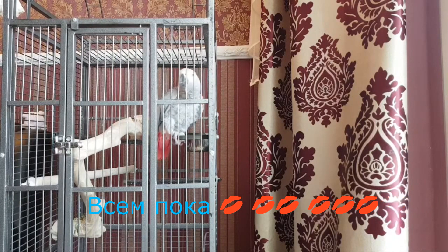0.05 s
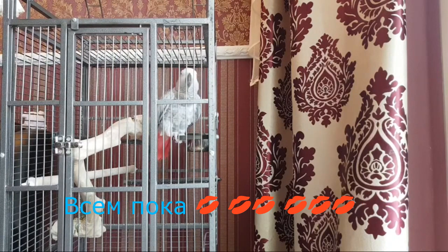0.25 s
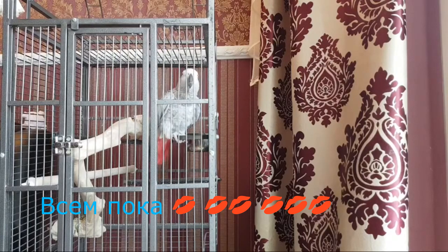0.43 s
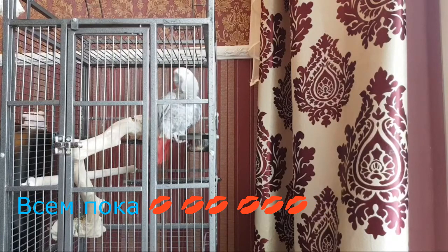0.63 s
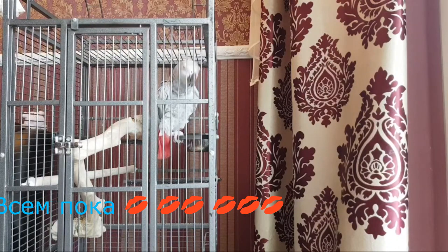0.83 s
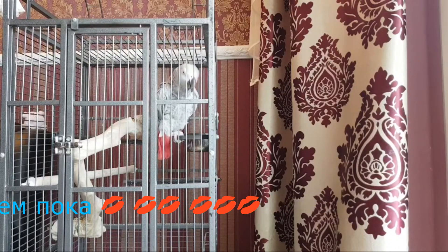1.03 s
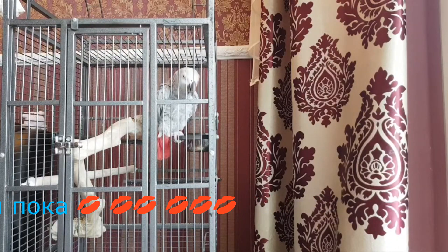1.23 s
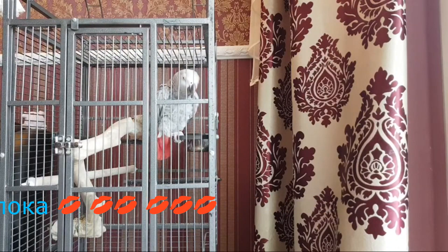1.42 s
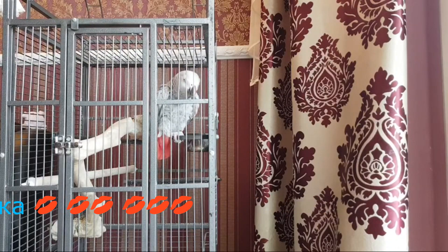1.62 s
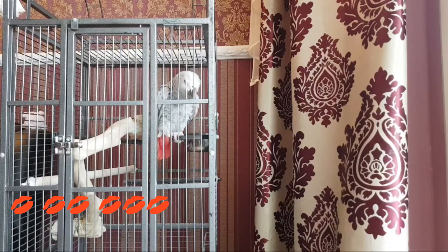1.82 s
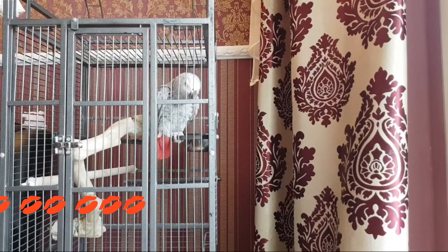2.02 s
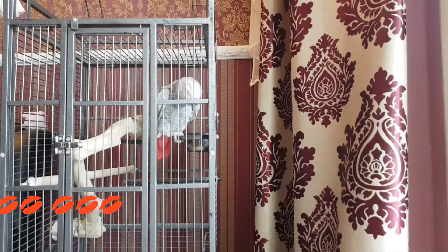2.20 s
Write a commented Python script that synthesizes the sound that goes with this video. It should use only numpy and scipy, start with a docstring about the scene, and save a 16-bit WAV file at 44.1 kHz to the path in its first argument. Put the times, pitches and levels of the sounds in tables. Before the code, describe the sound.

A caged parrot gives one drawn-out whine, hoarse at first, then clear and slowly sinking.

```python
"""A quiet room with a caged grey parrot: a low rumble and soft rustles (shaped noise) die away first.
Then comes one drawn-out whine. It opens as a hoarse rasp of random pulses, shaking tones and throat noise.
The level of everything dips for an instant, then the call clears into a nearly pure sine with faint
overtones that sinks in pitch. Thin whistles (narrow noise) ride over it; a soft click falls near its end.
Room tone, a faint steady hum and microphone hiss lie underneath."""
import sys
import numpy as np
from scipy import signal
from scipy.fft import rfft, irfft, next_fast_len
from scipy.io import wavfile

SR = 44100
rng = np.random.default_rng(int(sys.argv[2]) if len(sys.argv) > 2 else 0)


def materialize(psi):
    """Save the field psi as 16-bit PCM at rate SR to the path in sys.argv[1].

    A 1-D psi becomes a single channel; in a 2-D psi each row is a channel.
    """
    bounded = np.clip(np.atleast_2d(psi).T, -1, 1)
    quanta = np.round(bounded * 32767).astype(np.int16)
    wavfile.write(sys.argv[1], SR, quanta)


N = 99489
TIME = np.arange(N) / SR  # s
EDGE_FADE_S = 0.018
FLUTTER_PER_S = 70  # rate of the random shaking in the voices


def from_db(db):
    """Amplitude factor of a level in dB."""
    return 10 ** (np.asarray(db) / 20)


def rms_one(x):
    """Scale a signal to rms 1."""
    return x / np.sqrt(np.mean(x ** 2) + 1e-20)


def in_time(rows):
    """Each column of a curve, interpolated at every sample."""
    s, *columns = np.transpose(rows)
    return [np.interp(TIME, s, column) for column in columns]


def during(rows):
    """1 while a curve lasts, fading to 0 outside it."""
    inside_s = np.minimum(TIME - rows[0][0], rows[-1][0] - TIME)
    return np.clip(1 + inside_s / EDGE_FADE_S, 0, 1)


def drift(rate):
    """Smooth random wandering of rms 1: white noise through two equal one-pole low-passes."""
    r = np.exp(-2 * np.pi * rate / SR)
    settled = signal.lfilter([1], [1, -2 * r, r * r], rng.standard_normal(N + SR))[SR:]
    return rms_one(settled)


def coloured(x, spectrum):
    """A signal shaped by a (Hz, dB) table, with 12 dB per octave skirts beyond its ends; rms 1."""
    hz, db = np.transpose(spectrum)
    size = next_fast_len(N)
    f = np.maximum(np.arange(size // 2 + 1) * SR / size, 1)
    skirts = np.minimum(1, np.minimum(f / hz[0], hz[-1] / f)) ** 2
    gain = skirts * from_db(np.interp(np.log(f), np.log(hz), db))
    return rms_one(irfft(rfft(x, size) * gain, size)[:N])


def noise(spectrum):
    """Steady noise of the given colour; rms 1."""
    return coloured(rng.standard_normal(N), spectrum)


def phase_of(hz):
    """Running phase in radians of a fixed or moving frequency."""
    return 2 * np.pi * np.cumsum(hz * np.ones(N)) / SR


def narrow_noise(hz, width_hz):
    """Noise in a narrow, fixed or moving resonance: two drifts on a sine and a cosine; rms 1."""
    phase = phase_of(hz)
    return rms_one(drift(width_hz) * np.sin(phase) + drift(width_hz) * np.cos(phase))


def background():
    """Noise in two low bands rumbles and fades, rustles decay, and room tone, hum and hiss stay level."""
    # rumble before the call, lower band: [t/s, level/dB] and [f/Hz, level/dB]
    low_level = [(0.0, -57), (0.104, -67.5), (0.14, -59.5), (0.29, -69), (0.428, -77), (0.452, -75),
                 (0.514, -64), (0.692, -73.5), (0.73, -101)]
    low_colour = [(45, -16), (75, -13), (120, -11), (147, 11.5), (175, -19), (210, 4.5), (260, -3.5),
                  (330, -27), (600, -45)]
    # rumble, upper band: [t/s, level/dB] and [f/Hz, level/dB]
    top_level = [(0.0, -64.5), (0.362, -69), (0.4, -66.5), (0.422, -82), (0.594, -82), (0.72, -98)]
    top_colour = [(230, -18), (275, 4.5), (330, -10.5), (400, 0), (470, -15), (700, -22)]
    # soft rustles: [t/s, level/dB, time to fall 60 dB/s]
    rustles = [(0.0, -69, 0.91), (0.131, -71.5, 0.31), (0.3, -89, 0.34), (0.735, -84, 0.25)]
    # colour of the rustles: [f/Hz, level/dB]
    rustle_colour = [(400, -11), (700, 1.5), (900, -3), (1130, 10), (1350, 1.5), (1550, 1.5), (2100, -10),
                     (4500, -18), (8000, -43)]
    # colour of the room tone: [f/Hz, level/dB]
    room_tone_colour = [(25, -19), (60, -5.5), (100, 1.5), (200, -8.5), (400, -13.5), (900, -24),
                        (2000, -28), (5000, -32.5), (8500, -38)]
    # colour of the microphone hiss: [f/Hz, level/dB]
    hiss_colour = [(7000, -41), (9000, -17.5), (10200, -6.5), (11300, 1), (12300, 3.5), (15800, 2)]
    room_tone_db, hiss_db, hum_db, hum_hz = -71, -72.5, -77, 100
    rustle_attack_s = 0.02

    rumble = 0
    for level, colour in ((low_level, low_colour), (top_level, top_colour)):
        rumble = rumble + from_db(in_time(level)[0]) * during(level) * noise(colour)
    strokes = 0
    for s, db, decay_s in rustles:
        attack = np.clip(1 + (TIME - s) / rustle_attack_s, 0, 1)
        strokes = strokes + attack * from_db(db - 60 * np.maximum(TIME - s, 0) / decay_s)
    steady = from_db(room_tone_db) * noise(room_tone_colour) + from_db(hiss_db) * noise(hiss_colour)
    hum = from_db(hum_db) * np.sin(phase_of(hum_hz))
    return rumble + strokes * noise(rustle_colour) + steady + hum


def rasp():
    """Uneven random pulses ring the throat; a duller flutter and a low rustle come and go under the whine."""
    # irregular flutter of the syrinx while hoarse: [t/s, level/dB before the trim]
    rasp_level = [(0.89, -87.5), (0.946, -69), (1.002, -70), (1.048, -58), (1.184, -54.5), (1.202, -56.5),
                  (1.248, -58), (1.308, -52), (1.378, -56), (1.406, -53.5), (1.448, -63.5), (1.472, -54.5),
                  (1.52, -62)]
    # throat colour of the rasp: [f/Hz, level/dB]
    throat_colour = [(80, -30), (170, -9.5), (330, 3.5), (500, -2), (700, 2), (950, 1.5), (1200, 0.5),
                     (1450, -6.5), (1750, -12), (2150, -21.5), (3200, -34), (6000, -51)]
    # duller flutter under the whine: [t/s, level/dB before the trim]
    flutter_level = [(1.53, -58), (1.716, -65.5), (1.774, -64), (1.836, -74.5), (2.078, -66.5), (2.12, -91)]
    # colour of the duller flutter: [f/Hz, level/dB]
    flutter_colour = [(200, -8.5), (380, 2.5), (520, 2.5), (900, 1.5), (1250, -5), (1550, -12.5),
                      (2000, -26.5), (3000, -43)]
    # low rustle under the whine: [t/s, level/dB before the trim]
    bass_level = [(1.5, -61.5), (1.564, -68), (1.588, -53), (1.768, -73.5), (1.802, -56), (1.956, -88),
                  (2.084, -63), (2.12, -92)]
    # colour of the low rustle: [f/Hz, level/dB]
    bass_colour = [(120, -9), (170, 0.5), (260, 0.5), (450, -6.5)]
    rasp_trim_db, flutter_trim_db, bass_trim_db = 7, 6.5, -0.5
    pulses_per_s, scatter_db = 1600, 1.5  # mean rate, spread of pulse heights

    struck = rng.random(N) < pulses_per_s / SR
    pulses = struck * from_db(scatter_db * rng.standard_normal(N))
    pulses = pulses - pulses.mean()
    throat = from_db(in_time(rasp_level)[0] + rasp_trim_db) * during(rasp_level)
    throat = throat * coloured(pulses, throat_colour)
    flutter = from_db(in_time(flutter_level)[0] + flutter_trim_db) * during(flutter_level)
    flutter = flutter * coloured(pulses, flutter_colour)
    bass = from_db(in_time(bass_level)[0] + bass_trim_db) * during(bass_level) * noise(bass_colour)
    return throat + flutter + bass


def tone(pitch, level_db):
    """The syrinx tone: it shakes while hoarse and splits to half its pitch, then steadies."""
    # unsteadiness of the tone: [t/s, roughness/0-1]
    roughness = [(0.92, .75), (1.05, 0.61), (1.25, 0.46), (1.39, 0.25), (1.48, .35), (1.58, .06),
                 (1.95, 0.05), (2.06, 0.11), (2.15, .6)]
    # partials of the clear tone: [multiple of the pitch, level/dB re the fundamental]
    overtones = [(2, -36), (3, -55)]
    # level of the split tone: [t/s, level/dB]
    split_level = [(0.94, -66.5), (1.052, -49.5), (1.194, -67), (1.25, -50), (1.42, -70.5), (1.444, -83),
                   (1.466, -57.5), (1.63, -48.5), (1.72, -71.5)]
    # partials of the split tone: [multiple of the pitch, level/dB re the split level]
    split_tones = [(.5, -0.5), (1.5, -8.5)]
    # spreads at full roughness, as shares of the pitch, the level and the split tone's pitch
    jitter, shimmer, split_jitter = 0.06805, 0.93, 0.1708

    rough = np.clip(in_time(roughness)[0], 0, 1)
    phase = phase_of(pitch * (1 + jitter * rough * drift(FLUTTER_PER_S)))
    shake = 1 + shimmer * rough * drift(FLUTTER_PER_S)
    shake = shake / np.sqrt(1 + (shimmer * rough) ** 2)  # shaking adds no mean power
    wave = np.sin(phase) + sum(from_db(db) * np.sin(k * phase) for k, db in overtones)
    clear = np.sqrt(2) * from_db(level_db) * shake * wave

    loose_phase = phase_of(pitch * (1 + split_jitter * rough * drift(FLUTTER_PER_S)))
    halves = 0
    for k, db in split_tones:
        unsteady = 1 + rough * drift(FLUTTER_PER_S)
        halves = halves + from_db(db) * unsteady * np.sin(k * loose_phase)
    return clear + from_db(in_time(split_level)[0]) * during(split_level) * halves


def upper_voice():
    """A second, hoarse and wavering tone above the first early in the call, with quick gliding sines."""
    # upper voice of the hoarse opening: [t/s, f/Hz before the waver, level/dB before the trim]
    upper = [(0.91, 1150, -86), (0.934, 1160, -55.5), (0.982, 1180, -59.5), (1.0, 1170, -48.5),
             (1.058, 1160, -48), (1.094, 1200, -51), (1.112, 1290, -50), (1.212, 1270, -54.5),
             (1.222, 1250, -53.5), (1.27, 1190, -53.5), (1.338, 1140, -41.5), (1.382, 1190, -57),
             (1.416, 1180, -56), (1.43, 1240, -66.5)]
    # quick glides, mostly downward: [start t/s, length/s, from f/Hz, to f/Hz, level/dB]
    swoops = [(1.088, 0.048, 1480, 1170, -51), (1.14, 0.041, 1450, 1229, -49),
              (1.193, 0.056, 1620, 1145, -49.5), (1.349, 0.045, 1230, 1323, -61.5),
              (1.657, 0.042, 1390, 1282, -66.5)]
    trim_db, jitter, shimmer = -5, 0.03, 0.37  # jitter and shimmer as shares of pitch and level
    hoarse_db, hoarse_width_hz = -4, 105  # narrow noise around the tone

    hz, db = in_time(upper)
    waver = 1 + jitter * drift(FLUTTER_PER_S)
    voice = np.sin(phase_of(hz * waver)) + from_db(hoarse_db) * narrow_noise(hz, hoarse_width_hz)
    out = from_db(db + trim_db) * during(upper) * voice
    for s, length_s, from_hz, to_hz, level_db in swoops:
        along = np.clip((TIME - s) / length_s, 0, 1)
        glide = np.sin(phase_of(from_hz + (to_hz - from_hz) * along))
        out = out + from_db(level_db) * np.sin(np.pi * along) * glide
    return np.sqrt(2) * out * (1 + shimmer * drift(FLUTTER_PER_S))


def air(pitch):
    """Air rushing through the throat: flickering noise with resonances that partly follow the pitch."""
    # rushing air: [t/s, level/dB before the trim]
    air_level = [(0.94, -101), (1.084, -73.5), (1.104, -76), (1.12, -72.5), (1.23, -69.5), (1.298, -75),
                 (1.346, -69.5), (1.42, -78.5), (1.444, -93), (1.468, -76.5), (1.514, -83.5), (1.786, -91),
                 (2.028, -81.5), (2.1, -90)]
    # colour of the rushing air: [f/Hz, level/dB]
    air_colour = [(1500, -17.5), (2100, -14), (2550, -3.5), (3200, -9.5), (4100, -3), (4900, -7), (6000, 5),
                  (6900, -4), (7700, -11.5), (8800, -23.5), (9700, -8), (10500, -5.5), (12000, -18),
                  (15000, -29)]
    # resonances: [f/Hz at the reference pitch, exponent on the pitch ratio, width/Hz,
    #              level/dB re the reference air level, share of the air's swing in dB]
    resonances = [(6070, .2, 530, -5.5, 0.48), (9770, .15, 39, -8.5, 1.5), (4090, 0.13, 94, -12.5, 2),
                  (2535, 0.31, 190, -4.5, 1.5)]
    trim_db, flicker_db, flicker_per_s = 6, 2.0, 70
    reference_hz, reference_air_db = 687, -78

    air_db, = in_time(air_level)
    out = from_db(air_db + trim_db + flicker_db * drift(flicker_per_s)) * noise(air_colour)
    for hz, follows, width_hz, db, swing in resonances:
        level = from_db(reference_air_db + db + swing * (air_db - reference_air_db))
        out = out + level * narrow_noise(hz * (pitch / reference_hz) ** follows, width_hz)
    return out * during(air_level)


def high_whistles():
    """A thin whistle and a softer, airy one, both narrow noise, ride over the whine."""
    # thin high whistle: [t/s, f/Hz, level/dB]
    thin_curve = [(1.36, 6090, -63), (1.384, 6172, -80.5), (1.4, 6080, -61.5), (1.42, 6150, -64.5),
                  (1.444, 6190, -73), (1.46, 6040, -73), (1.492, 6040, -65), (1.526, 5950, -87.5),
                  (1.534, 6100, -68), (1.64, 6000, -82.5), (1.698, 5942, -66), (1.722, 5904, -84.5),
                  (1.814, 5750, -73.5), (1.87, 5810, -81.5), (1.986, 5690, -76.5), (2.06, 5948, -91.5)]
    # airy resonance over the whine: [t/s, level/dB before the trim]
    airy_level = [(1.57, -90), (1.654, -77), (1.708, -86.5), (1.76, -79.5), (1.84, -89.5), (2.022, -83),
                  (2.07, -85.5)]
    thin_width_hz = 55
    airy_hz, airy_width_hz, airy_trim_db = 4480, 230, -1

    hz, db = in_time(thin_curve)
    thin = from_db(db) * during(thin_curve) * narrow_noise(hz, thin_width_hz)
    airy = from_db(in_time(airy_level)[0] + airy_trim_db) * during(airy_level)
    return thin + airy * narrow_noise(airy_hz, airy_width_hz)


def second_voice():
    """A few faint higher sines swell, sag in pitch and fade in the middle of the whine."""
    # partials: [f/Hz at mid-swell before the wander, level/dB at the peak]
    partials = [(1675, -59.5), (1930, -70.5), (2300, -79.5)]
    start_s, length_s, sag_per_s = 1.775, 0.096, 0.2  # sag as a share of the pitch
    wander, wander_per_s = 0.01, 60

    swell = np.sin(np.pi * np.clip((TIME - start_s) / length_s, 0, 1))
    sag = 1 - sag_per_s * (TIME - start_s - length_s / 2)
    voice = 0
    for hz, db in partials:
        moving_hz = hz * (sag + wander * drift(wander_per_s))
        voice = voice + from_db(db) * np.sin(phase_of(moving_hz))
    return swell * voice


def room(x):
    """A short, diffuse tail: decaying noise, dulled by a gentle low-pass, convolved with the direct sound."""
    t60_s, wall_hz, gap_s = 0.15, 4220, 0.004
    tail_db = -18  # tail energy re direct, before the low-pass
    t = TIME[:SR // 2]
    tail = rng.standard_normal(len(t)) * from_db(-60 * t / t60_s) * (t > gap_s)
    tail = tail / np.sqrt(np.sum(tail ** 2))
    tail = signal.lfilter(*signal.butter(1, wall_hz, fs=SR), tail)
    return x + from_db(tail_db) * signal.fftconvolve(x, tail)[:N]


def scene():
    """The parrot's call, dying away at its end, in the room over the background."""
    # hoarse opening: [t/s, f/Hz before the shaking, level/dB]
    hoarse = [(0.905, 622, -71.5), (0.917, 623.6, -56.5), (0.945, 639.2, -46), (0.999, 650.2, -60.5),
              (1.027, 723, -56), (1.053, 703.6, -46.5), (1.095, 735.8, -55), (1.121, 773.4, -42.5),
              (1.143, 786, -53.5), (1.171, 792.5, -39.5), (1.211, 787.5, -56.5), (1.233, 775.2, -43),
              (1.253, 766.5, -48.5), (1.287, 757.4, -40), (1.303, 779.6, -41.5), (1.345, 771.6, -42.5),
              (1.367, 756.7, -49), (1.395, 759.8, -34.5), (1.411, 746.2, -40.5), (1.445, 739.6, -59)]
    # clear whine: [t/s, f/Hz before the shaking, level/dB]
    whine = [(1.45, 778.3, -65), (1.458, 714.2, -58), (1.474, 754.5, -39.5), (1.506, 743, -41),
             (1.532, 697.4, -36.5), (1.55, 703.7, -41.5), (1.588, 700.6, -29.5), (1.638, 698.4, -27.5),
             (1.662, 685.5, -24.5), (1.682, 660.6, -36), (1.694, 664, -27.5), (1.706, 658.3, -38),
             (1.722, 654.6, -30.5), (1.746, 660.5, -31), (1.758, 630, -42.5), (1.776, 655, -32),
             (1.808, 649, -31), (1.828, 644.6, -45), (1.914, 634.2, -30), (1.956, 643, -32.5),
             (1.968, 628.4, -37.5), (1.996, 620.7, -26), (2.01, 585, -37), (2.02, 644.3, -41.5),
             (2.054, 619, -31), (2.062, 638, -39), (2.115, 627.6, -52.5)]
    release_db_per_s = 297

    pitch, level_db = in_time(list(hoarse) + list(whine))
    level_db = level_db - release_db_per_s * np.maximum(TIME - whine[-1][0], 0)
    onset = np.clip(1 + (TIME - hoarse[0][0]) / EDGE_FADE_S, 0, 1)
    parrot = tone(pitch, level_db) * onset + upper_voice() + rasp()
    parrot = parrot + air(pitch) + high_whistles() + second_voice()
    return (room(parrot) + background())[None]


def record(dry):
    """The level dips briefly three times, the last time with a soft click; a steep low-pass cuts the top."""
    # brief dips in level: [t/s, depth/0-1, fall/s, recovery/s]
    dips = [(0.705, 0.68, 0.0045, 0.012), (1.445, 0.78, 0.013, 0.011), (2.078, 1, 0.0016, 0.0065)]
    click_s, click_db, click_decay_s = 2.0768, -45.5, 0.00066
    cutoff_hz = 15750

    for s, depth, fall_s, recovery_s in dips:
        width_s = np.where(TIME < s, fall_s, recovery_s)
        dry = dry * (1 - depth * np.exp(-((TIME - s) / width_s) ** 2))
    click = from_db(click_db) * (TIME >= click_s) * np.exp(-np.abs(TIME - click_s) / click_decay_s)
    low_pass = signal.ellip(12, 0.1, 80, cutoff_hz, fs=SR, output="sos")
    return signal.sosfilt(low_pass, dry + click)


dry = scene()
out = record(dry)
materialize(out)
```